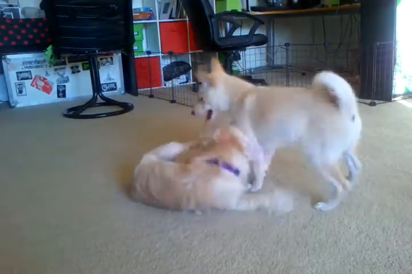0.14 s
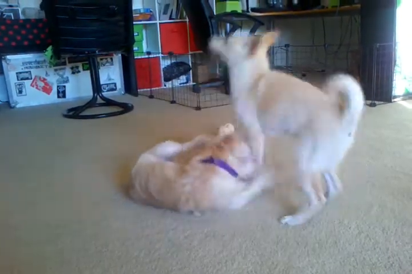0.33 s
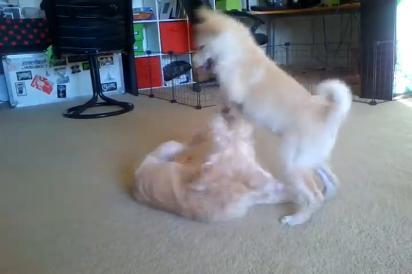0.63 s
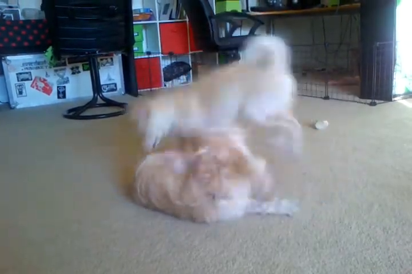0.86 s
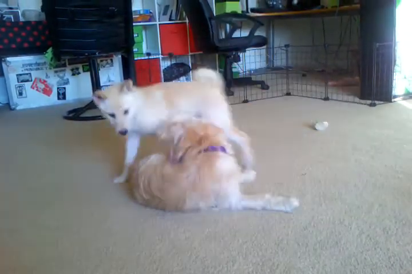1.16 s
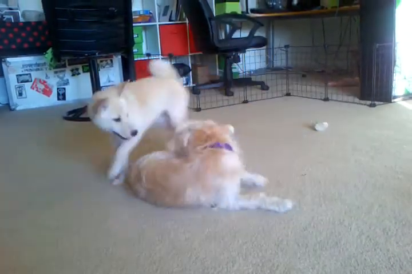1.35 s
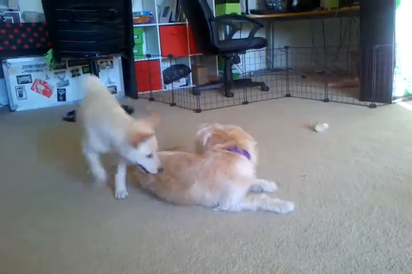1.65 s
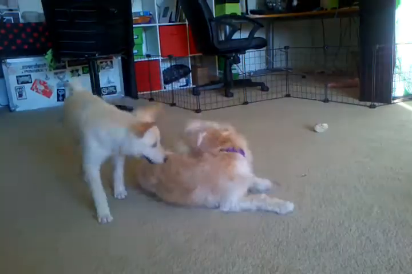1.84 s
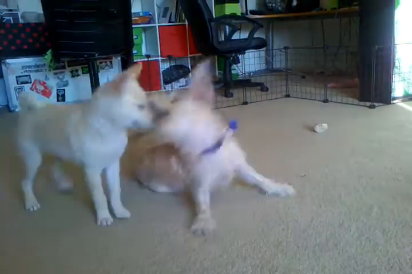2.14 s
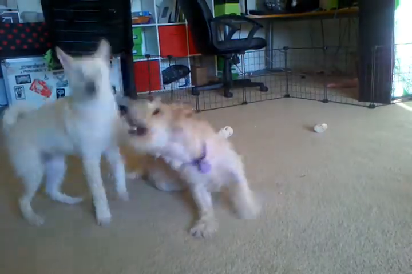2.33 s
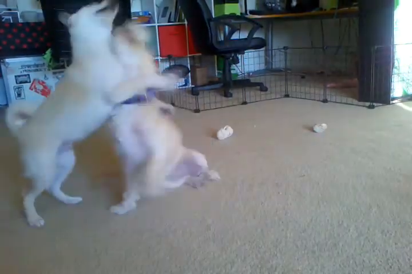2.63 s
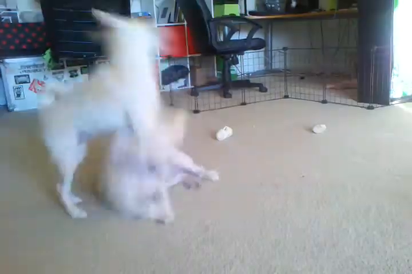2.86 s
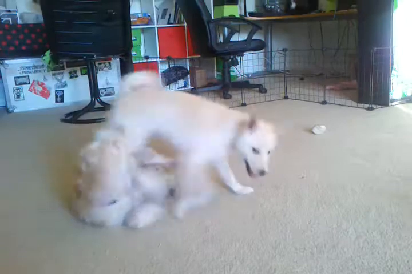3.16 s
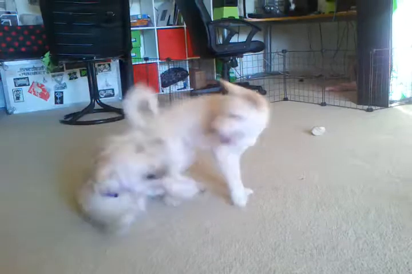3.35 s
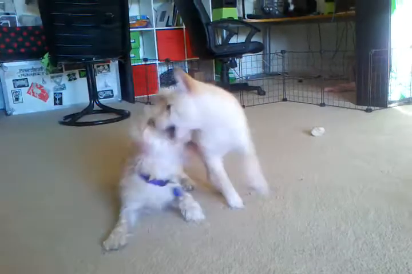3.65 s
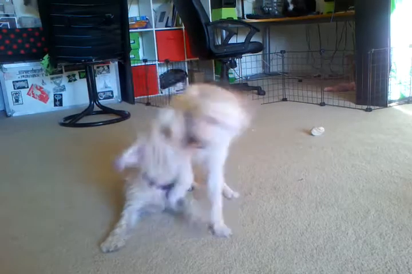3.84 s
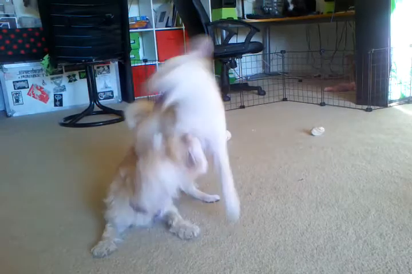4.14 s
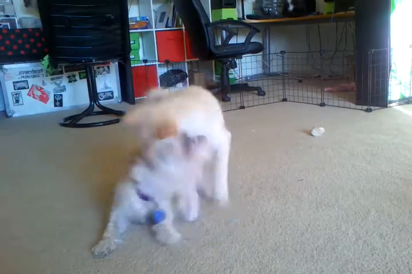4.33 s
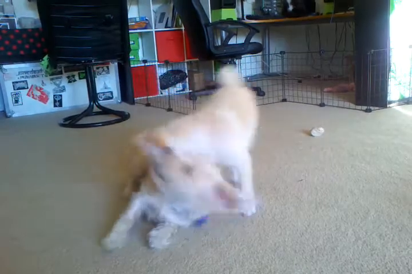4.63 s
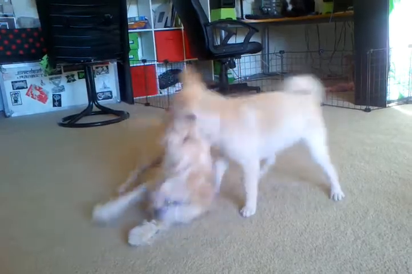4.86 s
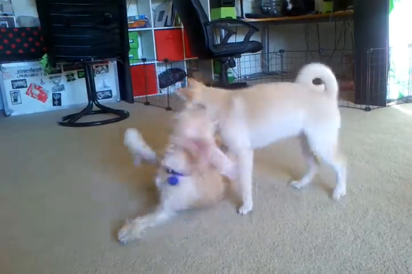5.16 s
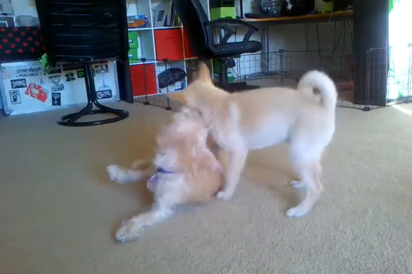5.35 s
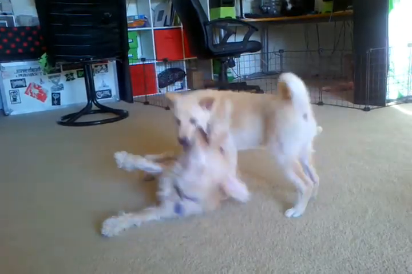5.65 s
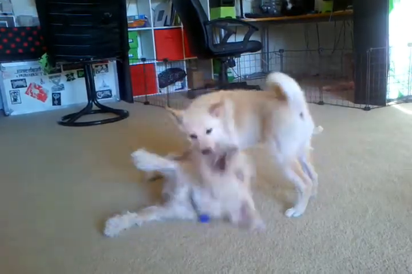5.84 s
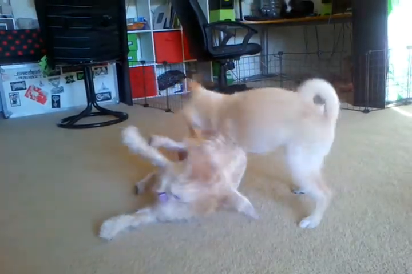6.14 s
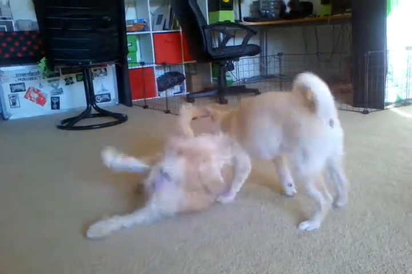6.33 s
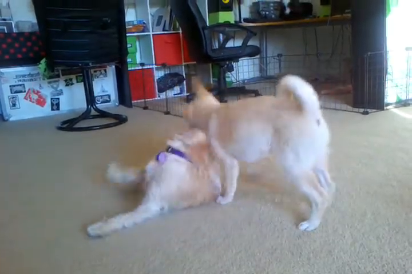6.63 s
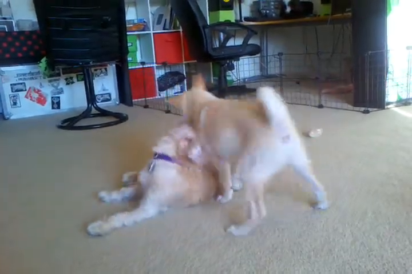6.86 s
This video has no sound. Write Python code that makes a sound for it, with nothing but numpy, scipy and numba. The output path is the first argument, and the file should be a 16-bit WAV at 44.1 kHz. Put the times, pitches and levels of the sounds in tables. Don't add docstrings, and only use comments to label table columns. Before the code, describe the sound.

Two dogs play-fight on carpet a couple of metres from a small handheld stereo microphone. It starts quiet, with faint pants, a jaw smack and soft paw thuds over a low hum and hiss. After two seconds, dense bright collar-tag clicks and rattles erupt with fur scuffs, peaking near three seconds. Sparser clacks follow, with snorts, one hard snap midway, a scraping nip, then near quiet.

```python
import sys
import numpy as np
from scipy import signal
from scipy.fft import rfft, irfft
from scipy.io import wavfile
from numba import njit

SR = 44100
rng = np.random.default_rng(int(sys.argv[2]) if len(sys.argv) > 2 else 0)


def output_pcm(signal):
    pcm = np.clip(np.atleast_2d(signal).T, -1, 1) * 32767
    wavfile.write(sys.argv[1], SR, np.round(pcm).astype(np.int16))


def volts(x):
    e = np.asarray(x, float) / 20
    return 10 ** e


N = 308259
SIZE = 5 * 2 ** 16
HZ = np.arange(SIZE // 2 + 1) * SR / SIZE
TIME = np.arange(N) / SR


def table(rows, column=1, hz=HZ):
    rows = np.array(rows, float)
    return np.interp(np.log(hz + 1), np.log(rows[:, 0]), rows[:, column])


def shape(x, gain):
    y = irfft(rfft(x, SIZE) * gain, SIZE)[..., :N]
    return y / np.sqrt(np.mean(y ** 2))


def noise():
    return rng.standard_normal((2, N))


def walk(rate):
    count = int(7 * rate) + 2
    y = np.interp(TIME * rate, np.arange(count), rng.standard_normal(count))
    return y / y.std()


@njit
def svf(x, hz, width):
    y, band, low = np.empty(len(x)), 0., 0.
    for i in range(len(x)):
        g, k = np.tan(np.pi * hz[i] / SR), width / hz[i]
        v = (band + g * (x[i] - low)) / (1 + g * (g + k))
        band, low, y[i] = 2 * v - band, low + 2 * g * v, k * v
    return y


# frequency in Hz, level in dB per Hz.
AIR_SPECTRUM = [(30, -104), (70, -89.5), (130, -82), (300, -86.5), (600, -93.5), (1000, -99), (2200, -104),
                (4000, -108), (5800, -112), (8000, -106), (10200, -105), (12200, -105), (13700, -103)]
# frequency in Hz, level in dB.
HUM_TONES = [(118, -74), (213.3, -67.5), (238, -77), (294, -76), (354.5, -74.5), (472.5, -71)]


def background():
    spectrum = volts(table(AIR_SPECTRUM)) * np.sqrt(SR / 2)
    air = irfft(rfft(noise(), SIZE) * spectrum, SIZE)[:, :N] * volts(0.95 * walk(3.573))
    hum = 0
    path_phase = np.array([[0], [.03]])
    for hz, db in HUM_TONES:
        level = volts(db + 0.5 + 1.56 * walk(5.4))
        hum = hum + level * np.sin(2 * np.pi * (hz * TIME + 0.094 * walk(5) + path_phase))
    return air + np.sqrt(2) * hum


# frequency in Hz, level in dB.
FUR_COLOUR = [(1000, -24), (3000, -2.5), (4200, 2.5), (5800, -33), (8000, 2.5), (10300, -6), (11500, -8),
              (13800, -3.5)]
# time of full level in seconds, hold in seconds, level in dB.
SCUFF_EVENTS = [(0.0, .2, -79), (1.76, 0.12, -56.5), (2.14, 0.07, -58.5), (2.36, 0.097, -63),
                (2.49, 0.0041, -51), (2.63, 0.017, -43.5), (2.71, 0.051, -45.5), (2.91, 0.0065, -36.5),
                (3.0, 0.12, -58.5), (3.12, 0.0055, -51.5), (3.78, 0.081, -53.5), (4.12, 0.029, -58),
                (4.19, 0.068, -57), (4.445, 0.018, -50.5), (4.72, 0.008, -54), (4.87, 0.021, -66.5),
                (5.12, 0.034, -53), (5.22, 0.092, -63), (5.86, 0.016, -63), (5.9, 0.017, -60),
                (6.18, 0.1, -61.5), (6.72, 0.016, -55.5)]


def rubbing():
    rise_db_s, fall_db_s = 311, 234
    push = 0
    for s, held, db in SCUFF_EVENTS:
        before, after = np.clip(s - TIME, 0, 1), np.clip(TIME - s - held, 0, 1)
        push = push + volts(db - rise_db_s * before - fall_db_s * after)
    bright_hz = 9820 + 300 * walk(6.3)
    crackle_db = 2.5 * rng.exponential(size=N) + 0.43 * walk(81)
    fur = shape(noise() * volts(crackle_db), volts(table(FUR_COLOUR)))
    bright = np.array([svf(path, bright_hz, 1120.0) for path in fur])
    return volts(-6.0) * push * (fur + 3.2 * bright)


# loudest moment in seconds, length in seconds, level in dB,
# mouth resonance in Hz, second resonance in Hz.
PANT_EVENTS = [(0.281, 0.14, -73, 1440, 2300), (1.233, 0.047, -68.5, 1310, 2200),
               (1.772, 0.048, -62.5, 1700, 4200), (1.828, 0.084, -51.5, 1500, 3950),
               (2.13, 0.063, -65, 1490, 4200), (2.92, 0.08, -56.5, 1320, 2000),
               (3.149, 0.043, -61, 1700, 2150), (3.67, 0.062, -67.5, 1180, 1780),
               (3.935, 0.025, -64, 1590, 2380), (5.032, 0.031, -69, 1450, 1140),
               (5.88, 0.044, -65, 1400, 1950)]
# loudest moment in seconds, length in seconds, level in dB,
# mouth resonance in Hz, second resonance in Hz.
SNORT_EVENTS = [(0.629, 0.095, -70, 2390, 3680), (0.939, 0.06, -60, 2100, 3640),
                (1.849, 0.11, -51, 730, 490), (2.333, 0.043, -59, 1700, 1060),
                (2.594, 0.078, -61.5, 1700, 1070), (3.355, 0.042, -54, 1510, 2180),
                (3.509, 0.053, -60, 1560, 3540), (3.976, 0.027, -55, 1010, 1790),
                (4, 0.035, -52.5, 2180, 1480), (4.02, 0.033, -60.5, 980, 1450),
                (4.49, 0.14, -66, 1670, 605), (5.353, 0.049, -52.5, 1940, 1670),
                (5.396, 0.051, -60.5, 1907, 2090), (5.649, 0.055, -65, 2050, 1480),
                (5.721, 0.02, -69, 1920, 1600), (6.214, 0.04, -66, 1520, 710),
                (6.708, 0.034, -78, 2160, 1600)]
# loudest moment in seconds, length in seconds, # level
# in dB, resonance in Hz, second resonance in Hz.
TAG_RINGS = [
    (4.19, .05, -54, 9900, 10200),
    (4.70, .05, -53, 9900, 10100),
    (5.148, .045, -47, 9850, 9950),
]


def panting():
    out, t = np.zeros((2, N + 16384)), np.arange(-4096, 8192) / SR
    still = np.ones(len(t))
    flutter = volts(2.2 * walk(70))
    puffs = [(*row, 9) for row in PANT_EVENTS]
    puffs += [(*row, -6) for row in SNORT_EVENTS]
    puffs += [(*row, -40) for row in TAG_RINGS]
    for s, length, db, low_hz, high_hz, rush_db in puffs:
        swell = np.exp(-(t / (length * np.where(t < 0, .4, .6))) ** 2)
        start = int(s * SR)
        for path, air in enumerate(rng.standard_normal((2, len(t)))):
            low = svf(svf(air, low_hz * still, 260.0), low_hz * still, 260.0)
            high = svf(svf(air, high_hz * still, 280.0), high_hz * still, 280.0)
            rush = svf(air, 1300 * still, 1630.0)
            puff = low / low.std() + volts(-0.5) * high / high.std() + volts(rush_db) * rush / rush.std()
            out[path, start:start + len(t)] += volts(db - 6.0) * swell * puff
    return out[:, 4096:N + 4096] * flutter


# start in seconds, peak in dB, pitch in Hz, 60 dB decay time in seconds.
THUD_EVENTS = [(0.45, -67, 360, 0.06), (0.883, -51, 155, 0.1), (0.908, -55.5, 294, 0.07),
               (0.942, -52, 217, 0.078), (0.962, -50.5, 180, 0.047), (1.004, -56, 233, 0.044),
               (1.789, -62, 370, 0.045), (2.145, -45.5, 176, 0.07), (2.147, -54, 342, 0.053),
               (2.179, -57, 176, 0.085), (3.133, -56, 211, 0.059), (3.353, -60, 300, 0.045),
               (3.667, -63, 300, .04), (3.684, -58, 600, 0.035), (3.778, -65, 226, 0.066),
               (4.484, -54, 537, 0.022), (4.823, -69, 297, 0.05), (6.828, -60, 244, 0.041)]
# start in seconds, peak
# in dB, pitch in Hz, 60 dB decay time in seconds.
SMACK_EVENTS = [(0.43, -65, 2140, 0.018), (.667, -59, 2320, 0.015), (2.2235, -61, 4830, .02),
                (2.245, -51, 1880, 0.0082), (3.471, -63, 1700, 0.015), (3.669, -60, 1210, 0.027),
                (4.484, -60, 1800, 0.014), (5.595, -48.5, 1710, 0.012), (5.716, -64, 1410, 0.033),
                (6.708, -58, 2520, .011)]


def thuds():
    out, t = np.zeros((2, N + 8192)), np.arange(8192) / SR
    for s, db, hz, t60 in THUD_EVENTS + SMACK_EVENTS:
        pitch_chance, phase = rng.random((2, 2, 1))
        fade = (1 - np.exp(-t / 0.0017)) * np.exp(-np.log(1000) * t / max(t60, .01))
        ring = np.sin(2 * np.pi * (hz * (0.83 + 0.18 * pitch_chance) * t + phase))
        rumble = np.array([svf(v, hz + 0 * t, 300.) for v in rng.standard_normal((2, len(t)))])
        start = int(s * SR)
        out[:, start:start + len(t)] += volts(db + 14.0) * (fade * ring + volts(-2.0) * fade ** 0.5 * rumble)
    return out[:, :N]


# frequency in Hz, width in Hz, level in dB.
RING_MODES = [(4215, 1160, 5), (8650, 1920, -2.5), (12600, 1500, 2.5), (1700, 2400, -7), (10100, 1530, 8.5),
              (11360, 1200, 3.5), (9680, 410, 7), (3640, 183, 8.5), (6170, 470, -3)]


def ringing(low_db, mid_db, top_db, knock_db):
    t = np.arange(768) / SR
    own_levels = [low_db, mid_db, top_db, knock_db, 0, 0.43 * top_db, 0,
                  low_db - 9, 1.5 * low_db + 0.31 * mid_db]
    ring = 0
    for (hz, width, mode_db), own_db in zip(RING_MODES, own_levels):
        swell = width * t * np.exp(-np.pi * width * t) * np.sqrt(width)
        pitch = hz + .13 * width * rng.standard_normal()
        ring = ring + volts(mode_db + own_db) * swell * np.sin(2 * np.pi * pitch * t)
    return ring


# start in
# seconds, peak in dB, # 4 kHz ringing in dB, 7.5 kHz ringing in dB, 13 kHz ringing in dB.
TUSSLE_CLICKS = [(2.2477, -16, -4, 7, 2), (2.2592, -14, -6, 11, -3), (2.2618, -13, -8, 1.0, -11.0),
                 (2.271, -26, -9, 18, 0.0), (2.2708, -10.5, 2, 15.5, 2), (2.2739, -12, 1, 18, 2.0),
                 (2.2824, -32, -3, 13.0, -1.0), (2.289, -35, -2.0, 12.0, 0.0),
                 (2.2966, -33.0, -1, 12.0, 1.0), (2.3038, -38, -2.0, 11.0, -4.0),
                 (2.3065, -34.0, -9, 5, -5.0), (2.3099, -41, -6, 10, -4), (2.3206, -40, -2, 15.0, 1.0),
                 (2.452, -23.5, 6, 9, 13), (2.5563, -43.0, -10.0, 2.0, -9.0), (2.5758, -11, -7, 11, 7),
                 (2.5817, -12.5, -1.5, 4.5, 15), (2.602, -18, 1, 7, 4.0), (2.6087, -27.0, -9, 5.0, -4.0),
                 (2.6197, -31.0, -7, 11, -1.0), (2.6287, -29, 0, 8, -3.0), (2.6339, -29, -2, 12, -3.0),
                 (2.6554, -36.0, -9.0, 6.0, -2.0), (2.6753, -34, -8, 3.0, -3.0),
                 (2.6936, -32, 1.0, 8.0, 13), (2.6977, -20.5, 3, 12, 4), (2.7097, -38, -8, 18, 5.0),
                 (2.7143, -34, -1, 14.0, 0.0)]
LATE_TUSSLE_CLICKS = [(2.733, -18, -16.0, 8.5, -2), (2.7436, -22.0, -7.0, 8.0, 3.0), (2.7477, -27, -10, 12, -1.0),
                      (2.7861, -42, -11.0, 3.0, -9.0), (2.7991, -33, 8.0, 10.0, 2.0), (2.809, -31, -1, 12.0, 4),
                      (2.816, -17.0, -10, 4, -7.0), (2.8202, -17, -4, 8.0, -6.0), (2.8244, -16, -8, -1.0, 9),
                      (2.8361, -28, -8, 12.0, 0.0), (2.843, -13.5, -10, 9, -7), (2.847, -19, -4, 1, -3),
                      (2.86, -34, -4, 9.0, 1), (2.868, -37, -4.0, 10.0, -3), (2.8829, -22.0, -14, 10.0, -5),
                      (2.8864, -4.5, -21.0, 0, -17), (2.8917, -19, -15.0, 2.0, -5.0),
                      (2.8945, -27, -10.0, 7.0, -6.0), (2.897, -22.0, -12.0, 8.0, -5.0),
                      (2.8992, -23, -15.0, 3.0, -3.0), (2.9148, -19, -11.0, -2.0, -8.0),
                      (2.9166, -19, -13, 0.0, -6.0), (2.9251, -25, -8.0, 0.0, -6.0), (2.932, -25, -14.0, 0, -10.0),
                      (2.935, -26, -9.0, -2.0, -6.0), (2.9383, -38, -14, 0, -1.0), (2.9429, -32.0, -8, 1.0, -4.0),
                      (2.971, -39.0, -9.0, 0.0, -9.0), (3.0147, -46, -16.0, -4.0, -11.0),
                      (3.0286, -20.5, -22.0, -14.0, -29.0), (3.033, -29, -11, 6, -7.0),
                      (3.0585, -36, -15, -2.0, -13.0), (3.0677, -26, -9, -3.0, -9.0),
                      (3.0717, -35, -13.0, -9.0, -5), (3.0763, -16.5, -3, 4, -1), (3.0794, -23, -15, 0.0, -1),
                      (3.101, -16.5, -6.5, -5, -7), (3.1042, -18, -12.0, 0, 15), (3.1097, -29, -15.0, -2.0, -3)]
ROLL_CLICKS = [(3.7486, -44, -5.0, -1.0, 3.0), (3.7516, -36.0, -19.0, 8.0, -11.0),
               (3.7526, -32.0, -16.0, 7, -8.0), (3.756, -35.0, -23.0, 13, -16.0),
               (3.7617, -44, -21.0, -4.0, -10.0), (3.7693, -23, -9, 11, -10.0),
               (3.7761, -41, -20.0, 6.0, -11.0), (3.7804, -26, -12, 15, -2.0), (3.784, -25, -17.0, 8, -1.0),
               (3.7897, -32, -21.0, 4.0, -13.0), (3.796, -18.5, -13, 3, -8), (3.8087, -31, -4, 2, -9),
               (3.856, -32.5, -23.0, -13, -21), (3.9516, -26, -13, -13.0, -19), (4.006, -36, -3, 1, 5),
               (4.0905, -28.5, 0, 17, 9.0), (4.1144, -41.0, 0.0, 9.0, 16), (4.1262, -23, -17, 11.5, 4),
               (4.1622, -41.0, -16.0, -1, -14.0), (4.1943, -38.0, -14.0, -5.0, -8.0),
               (4.2054, -28, -14.0, -5.0, -3.0), (4.22, -30, 2, 8, 14), (4.222, -28, -16.0, -6.0, -3.0),
               (4.3766, -35, -19.0, 7, -2), (4.3826, -36, -7, 2.0, -14.0), (4.437, -23.5, -4, -1, -4),
               (4.4421, -33, -7, 2.0, -6.0), (4.4444, -30, 5, 1, 5.0), (4.455, -24, -5.0, 3.0, 6),
               (4.4917, -33, -12.0, 5, 12), (4.511, -4.5, -12.5, -12, -7), (4.5136, -14.5, -17, -22, -3),
               (4.5215, -38, -7, 6.0, 2), (4.5236, -33, -6, 10.0, 8), (4.5343, -38, -10, -4.0, 1),
               (4.5429, -46, -9.0, 1, -5.0)]
NIP_CLICKS = [(4.682, -23.5, -10, -5, -7), (4.7017, -41.0, -5.0, -1.0, -5.0),
              (4.7114, -30.5, -7, 1.0, -2.0), (4.7239, -34, -6, 5.0, 3.0), (4.7503, -24.5, -8.0, -7, -2),
              (4.7629, -42.0, -9.0, 0.0, -5.0), (4.957, -29.0, 3, 13.0, 7), (5.0898, -22.5, -1, 2, 8),
              (5.0952, -22.5, -10.5, 8, 0), (5.1042, -38.0, -9.0, 0.0, -5.0),
              (5.1119, -39, -12.0, -5.0, -1.0), (5.1234, -37.0, -15.0, 2.0, -5.0),
              (5.128, -31.0, -3, 9, 6.0), (5.1328, -34.0, -8.0, 6.0, 6.0), (5.1345, -19.5, -16, 2.0, 2.5),
              (5.1524, -34, -22.0, -3.0, -16.0), (5.1868, -33, -11.0, 3, -7.0),
              (5.19, -31, -11.0, 5.0, 3.0), (5.2, -30, -6, 11, 4.0), (5.2037, -33.0, -18.0, 7, -10.0),
              (5.2086, -30, -9.0, 4, -1.0), (5.2291, -10.5, -13, -6, -2), (5.2417, -38, -6, 10, 0.0),
              (5.2543, -40, -3, 11.0, 4.0), (5.8398, -25.5, -7, 11, 12), (5.8635, -36.0, -13.0, 9.0, -3.0),
              (5.8664, -29, -8.0, 0, -2.0), (5.868, -39, -14.0, 0.0, 3.0), (5.8988, -30, -8.0, 2, -1.0),
              (5.9054, -28.5, -11.0, 0.0, 3.0), (5.921, -40, -3, 6.0, -9.0), (5.9517, -38, -3, 11.0, 5.0),
              (6.709, -30, -2.0, 15, 2.0), (6.7164, -28.5, -6.5, 1, 2.0)]
# start in seconds, peak in dB, 4 kHz ringing in dB,
# 7.5 kHz ringing in dB.
TAG_RATTLES = [(2.275, -26, -8, 4), (2.552, -34, -22, -6), (2.572, -18, -12, 11), (2.5855, -13, -5, 10),
               (2.694, -35, -2, 10), (2.6999, -16, -4, 10), (2.732, -23, -11, 6), (2.798, -25, -1, 10),
               (2.809, -29, 4, 8), (2.888, -22, -20, -4), (2.905, -24, -14, -4), (3.0234, -20, -8, -12),
               (3.066, -26, -15, -10), (3.797, -26, -12, 0), (4.19, -29, -25, -15), (4.44, -25, -10, -4),
               (4.7, -30, -6, -16), (4.966, -34, -10, 6), (5.1266, -29, -15, 8), (5.137, -18, -27, -12),
               (5.189, -25, -11, 2), (5.899, -26, -11, -14), (5.909, -37, 0, 4), (5.951, -36, -3, 12)]
# start in seconds, peak in dB, 4 kHz ringing in dB,
# 7.5 kHz ringing in dB, body knock in dB.
TEETH_BITES = [(2.1626, -46, 9, -6, -6), (2.4504, -21.5, 0.5, 4, -1.5), (2.4615, -27, -7, 6, 0),
               (2.905, -23, -14, -10, 11), (5.55, -45, 8, 4, -7), (2.954, -36, -9, -4, -7),
               (3.662, -31.5, 1, 3, 27), (4.013, -32, -7, 3, -7), (4.0783, -27.5, -9.5, 9, 5.5),
               (4.6723, -22.5, -9, -3, -1), (5.858, -34, -6, -5, 4), (5.886, -49, 6, -7, 15),
               (5.909, -25, -8, 12, 3.5)]
# start in seconds, peak in dB, 4 kHz ringing in dB,
# 7.5 kHz ringing in dB.
TAG_SLAMS = [
    (2.2485, -12.5, 2, 3),
    (2.2515, -11, -6, -4),
    (2.5835, -11.5, -13, 8),
    (2.8222, -13, -4, -2),
    (4.5123, -21, -12, -15),
    (5.2298, -31, -13, -6),
]


def clacks():
    out, t = np.zeros((2, N + 4096)), np.arange(-63, 1089) / SR
    knock = -25
    # missing levels, 60 dB decay in s, chatter amount, decay curve, first-strike strength
    rows = [(*row, knock, 0.0083, 0.24, 1, 1) for row in TUSSLE_CLICKS + LATE_TUSSLE_CLICKS + ROLL_CLICKS + NIP_CLICKS]
    rows += [(*row, 0, knock, 0.081, 0.14, 1, 0) for row in TAG_RATTLES]
    rows += [(*row[:4], 0, row[4], 0.029, 0.14, 1, 1.5) for row in TEETH_BITES]
    rows += [(*row, 0, knock, .0075, .35, 1.7, 0) for row in TAG_SLAMS]
    for s, db, low_db, mid_db, top_db, knock_db, t60, chatter, hold, strike in rows:
        gather = -(t / 0.00044) ** 2
        decay = -np.log(1000) * (abs(t) / max(t60, .001)) ** hold
        one, two = rng.standard_normal((2, len(t)))
        hits = one * two * np.exp(np.where(t < 0, gather, decay)) * chatter
        hits[63] += strike
        sound = np.convolve(hits, ringing(low_db, mid_db, top_db, knock_db))
        sound *= volts(db + 6.5) / np.sqrt(np.sum(sound ** 2))
        for port, lag in enumerate((0, int(3 * rng.standard_normal()))):
            start = int(s * SR) + lag - 78
            out[port, start:start + len(sound)] += sound
    return out[:, :N]


# frequency in Hz, 60 dB decay time in seconds, level in dB.
ROOM_BANDS = [(1700, 0.1, -54), (4200, 0.24, -25), (8000, 0.2, -17.5), (9960, 0.09, -26),
              (12000, 0.23, -24.5)]


def room(x):
    t, hz = np.arange(16384) / SR, np.arange(8193) * SR / 16384
    centres = np.log([row[0] for row in ROOM_BANDS])
    wash = 0
    for k, (_, t60, db) in enumerate(ROOM_BANDS):
        band = np.sqrt(np.interp(np.log(hz + 1), centres, np.arange(len(ROOM_BANDS)) == k))
        fade = np.exp(-np.log(1000) * t / t60) * (1 - np.exp(-(t / .009) ** 2))
        wash = wash + volts(db - 14.0) * fade * irfft(rfft(rng.standard_normal((2, len(t)))) * band)
    return signal.oaconvolve(wash, x[None], axes=1)[:, :N]


# frequency in Hz, level of first port over second in dB.
PORT_BALANCE = [(1500, 3.5), (2600, 2), (4000, -4.5), (4700, -19), (5500, 17), (7500, 4.5), (8500, 17),
                (14000, 34)]


def steer(first, second):
    tilt = volts(table(PORT_BALANCE) / 2)
    late = np.exp(-2j * np.pi * HZ * 0.00032)
    a, b = first * tilt, second / tilt
    return np.array([a - late * b, b - late * a]) / np.sqrt(tilt ** 2 + tilt ** -2.)


# frequency in Hz, correlation from 0 to 1.
PORT_LIKENESS = [(30, 0.54), (300, 0.74), (800, 0.46), (2000, 0), (3000, 0.)]


def diffuse(paths, steered):
    alike, share = np.clip(table(PORT_LIKENESS), 0, .99), np.clip(table(steered), 0, 1)
    one, two = rfft(paths, SIZE)
    loose = np.sqrt(1 - share)
    from_one = np.sqrt(share) * steer(1, alike) + loose * np.array([[1], [0]])
    from_two = np.sqrt(share) * steer(0, np.sqrt(1 - alike ** 2)) + loose * np.array([[0], [1]])
    return (from_one * one + from_two * two) / np.sqrt(abs(from_one) ** 2 + abs(from_two) ** 2)


# frequency in Hz, share from 0 to 1.
ROOM_STEERED = [(3500, 1.), (4600, 0.036), (6200, 0.09), (8000, 0.11), (12000, 0.39)]
DOGS_STEERED = [(3500, 1.), (4600, 0.47), (6200, 0.19), (8000, 0.26), (12000, 0.67)]


def scene():
    still_room = diffuse(background(), ROOM_STEERED)
    scuffle = rubbing() + panting() + thuds()
    hits = clacks()
    dogs = diffuse(scuffle + room(hits[0]), DOGS_STEERED)
    direct = steer(*rfft(hits, SIZE))
    return irfft(direct + dogs + still_room, SIZE)[:, :N]


def roll_off(x):
    return signal.sosfilt(signal.butter(12, 15280, fs=SR, output="sos"), x)


def record(dry):
    cut = np.clip((13940 - HZ) / 250 + .5, .03, 1)
    mix = irfft(rfft(dry, SIZE) * cut, SIZE)[:, :N]
    return roll_off(mix)


dry = scene()
out = record(dry)
output_pcm(out)
```